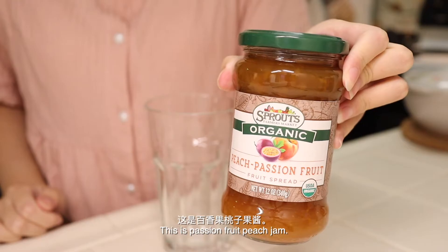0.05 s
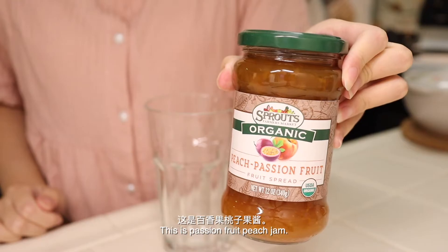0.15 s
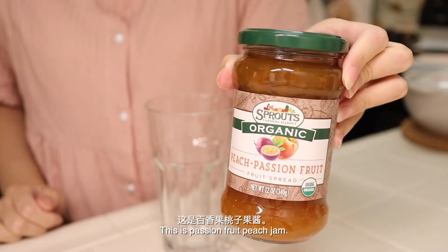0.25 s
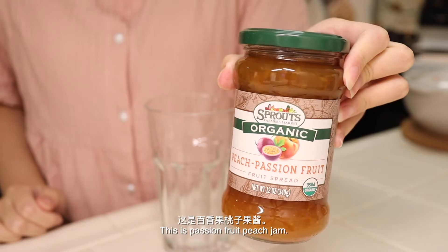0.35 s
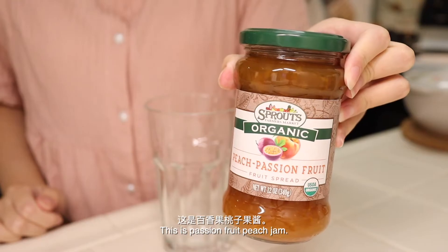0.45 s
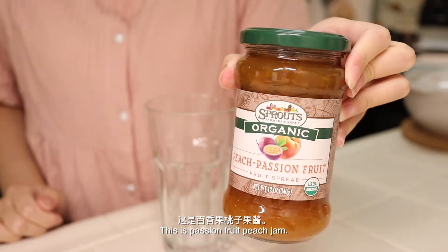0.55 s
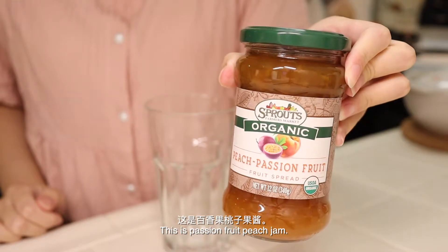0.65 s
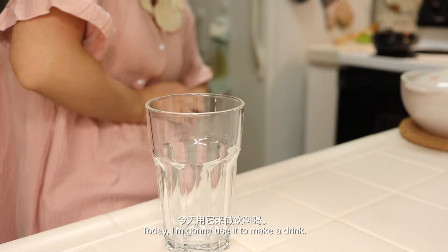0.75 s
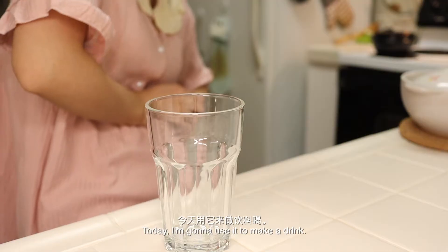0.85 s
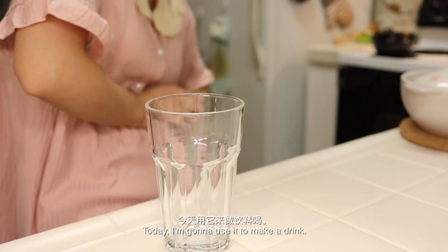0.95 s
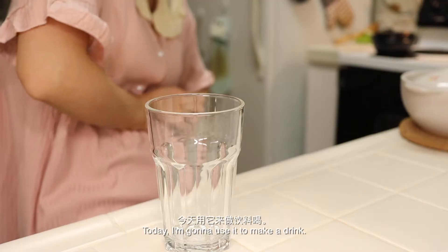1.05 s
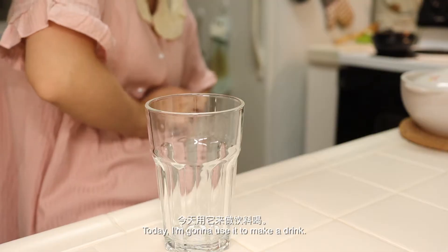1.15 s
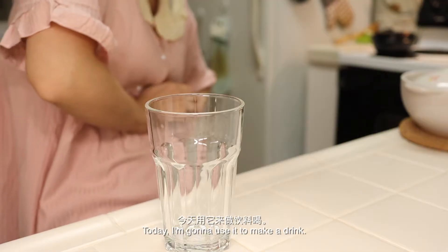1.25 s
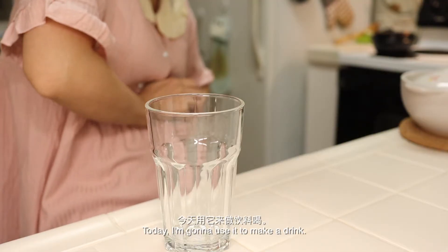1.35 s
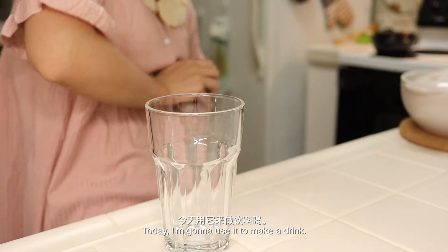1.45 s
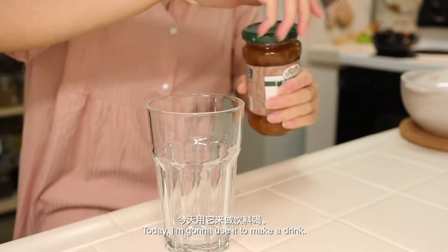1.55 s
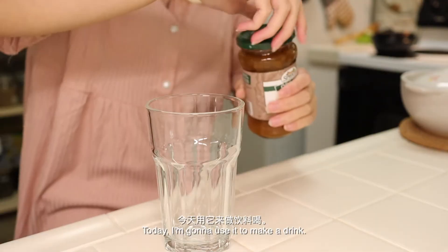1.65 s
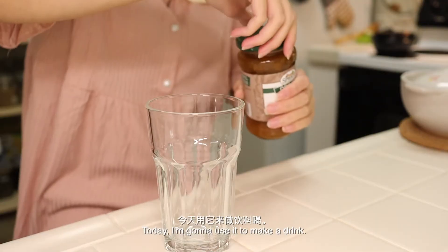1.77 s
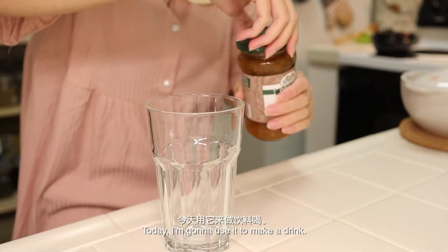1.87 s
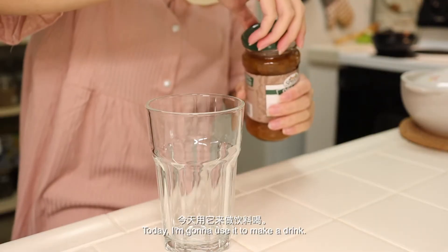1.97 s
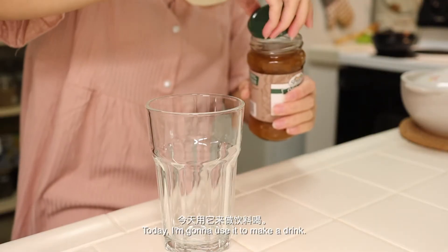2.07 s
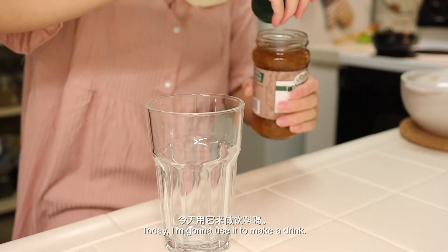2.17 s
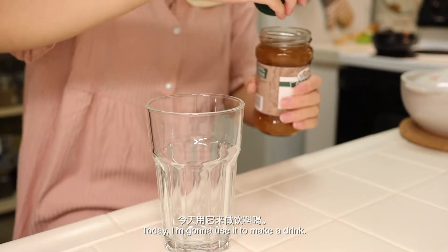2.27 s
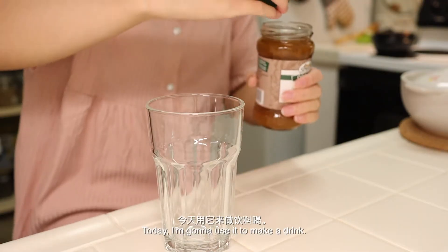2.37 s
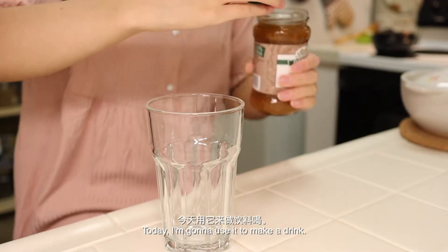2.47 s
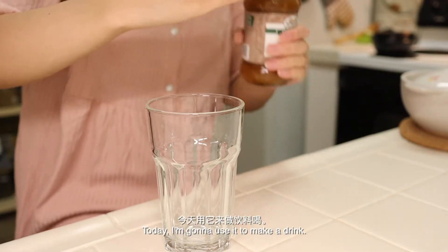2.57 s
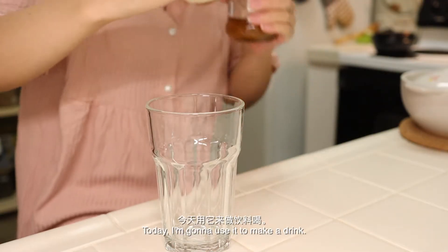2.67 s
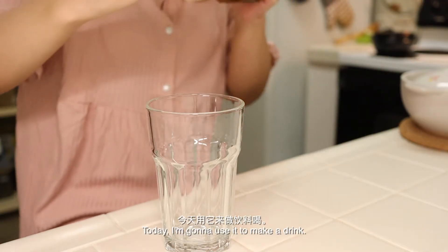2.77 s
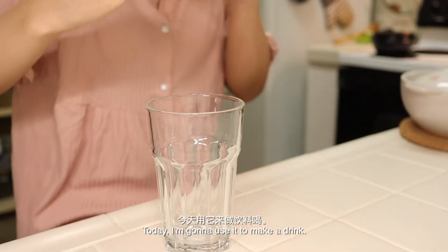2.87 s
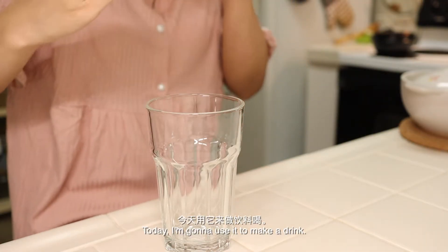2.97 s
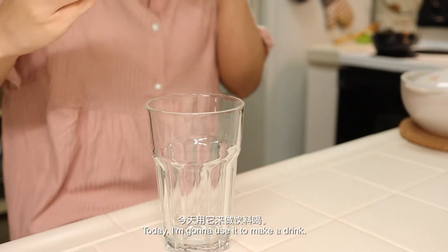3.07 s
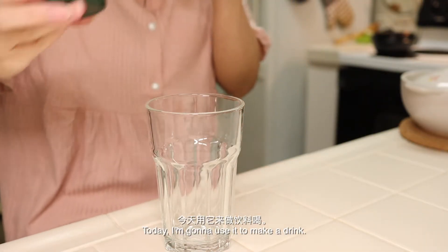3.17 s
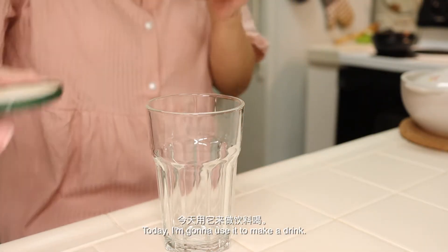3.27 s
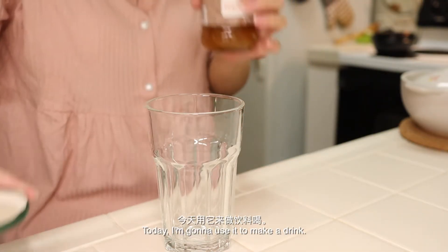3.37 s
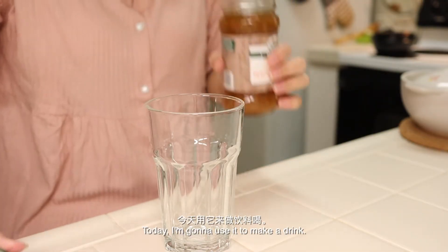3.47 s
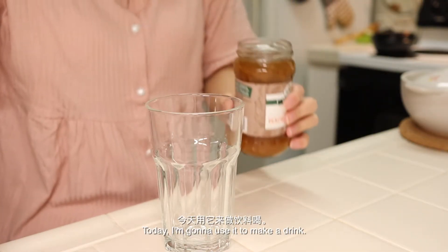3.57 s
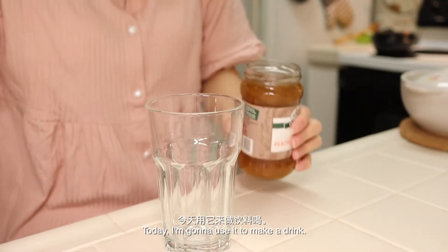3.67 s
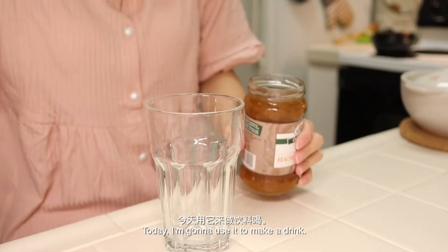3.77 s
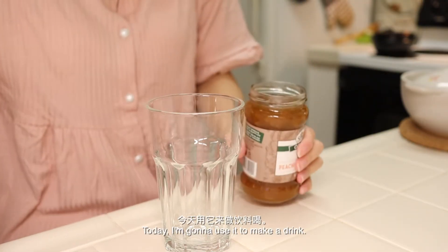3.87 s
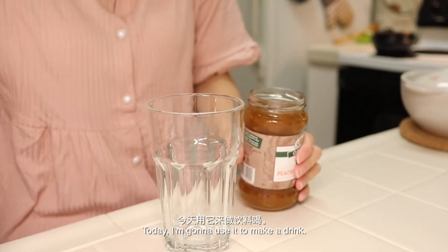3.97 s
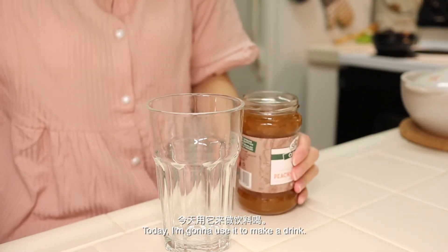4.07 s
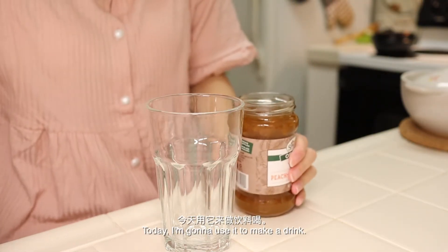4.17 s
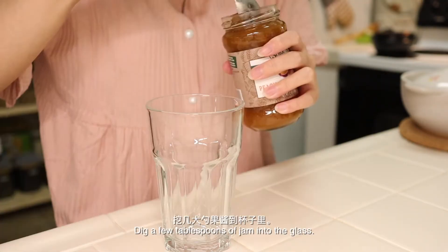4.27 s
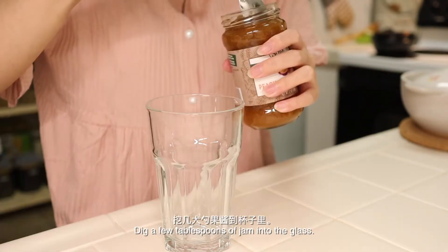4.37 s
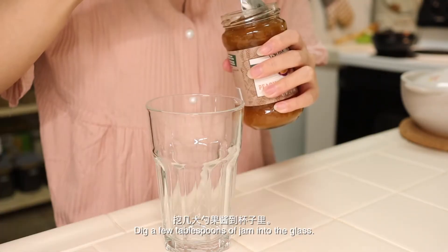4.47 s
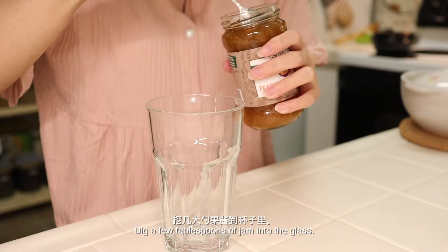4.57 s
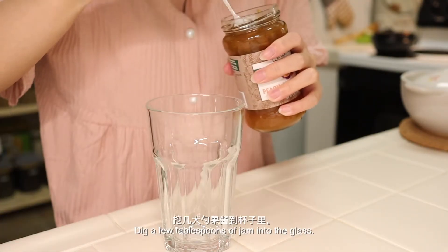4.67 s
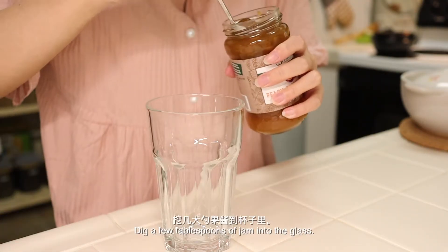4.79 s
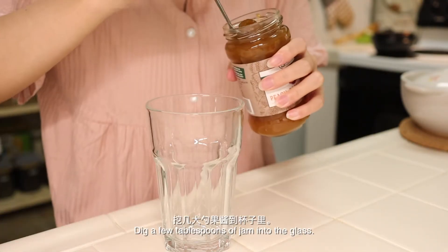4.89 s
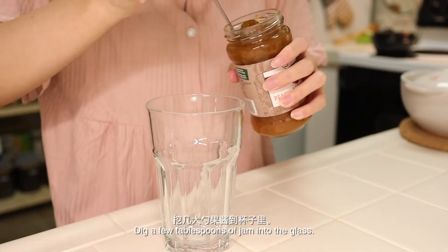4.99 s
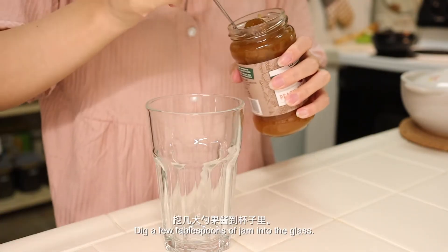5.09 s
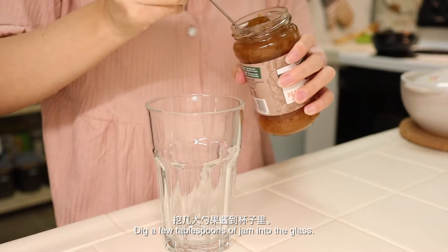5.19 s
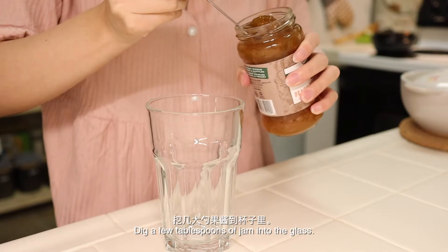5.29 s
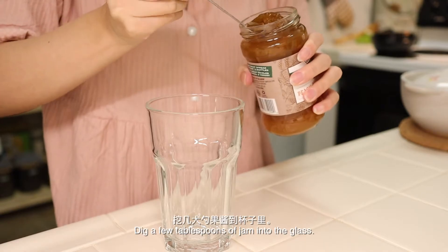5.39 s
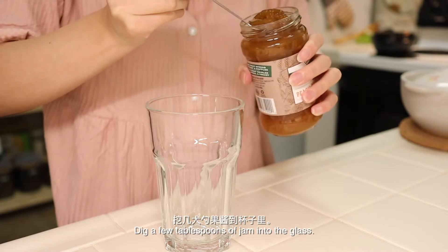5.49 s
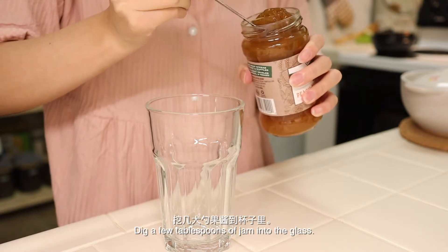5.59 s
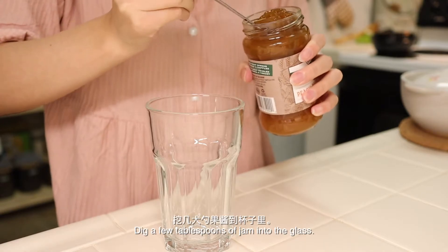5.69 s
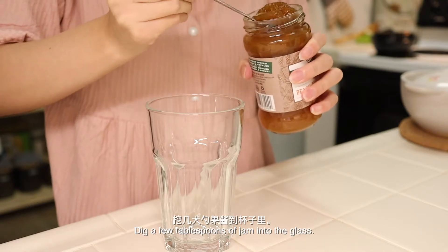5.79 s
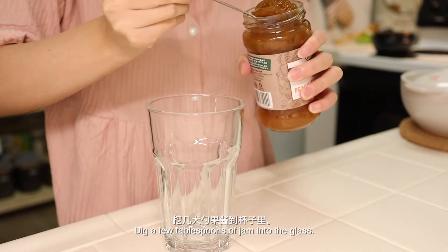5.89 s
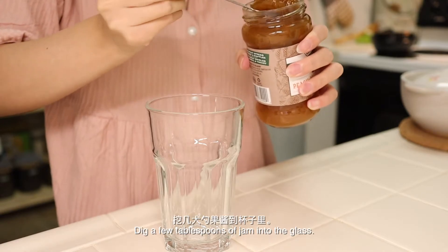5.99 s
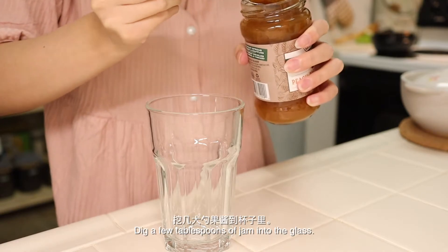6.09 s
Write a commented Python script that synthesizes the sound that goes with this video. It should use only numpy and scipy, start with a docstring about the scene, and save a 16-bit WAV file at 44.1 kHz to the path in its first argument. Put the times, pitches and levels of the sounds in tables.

```python
"""Over fan noise and motor hum in a quiet kitchen, a jam jar's lid creaks by stick-slip, then pops as air rushes in.
The loose lid scrapes and rattles off the thread; after a soft brush and wet smacks it lands on the tiles and slides.
The jar is put down with a knock and slides, and its ringing stops abruptly; a spoon clinks and digs into sticky jam.
Blows are noise bursts plus decaying modes with reverberation; slides are noise in narrow resonances."""
import sys
import numpy as np
from scipy import signal
from scipy.fft import rfft, irfft
from scipy.io import wavfile
from scipy.ndimage import uniform_filter1d

SR = 44100
rng = np.random.default_rng(int(sys.argv[2]) if len(sys.argv) > 2 else 0)


def wav_record(signal):
    """Record a signal, one row per channel, as 16-bit PCM in the file named by sys.argv[1]."""
    frames = np.transpose(np.atleast_2d(signal))
    bounded = np.clip(frames, -1, 1)
    # unit amplitude maps onto the largest positive 16-bit level
    quanta = np.round(bounded * 32767).astype(np.int16)
    wavfile.write(sys.argv[1], SR, quanta)


N = 270774


def amp(db):
    """Decibel law: 20 dB is a tenfold amplitude."""
    return 10 ** (np.asarray(db) / 20)


def unit(x):
    """Normalisation to an rms amplitude of 1."""
    return x / np.sqrt(np.mean(x ** 2) + 1e-20)


def read(points, hz):
    """Linear interpolation of a table along a logarithmic frequency axis."""
    f, value = np.transpose(points)
    return np.interp(np.log(hz + 1), np.log(f + 1), value)


def add(mix, s, sound):
    """Superposition: adds a sound to the mix from time s."""
    part = mix[round(s * SR):][:len(sound)]
    part += sound[:len(part)]


def swell(span):
    """Half-sine envelope: one soft arch of level between two times."""
    return np.sin(np.pi * np.interp(np.arange(N) / SR, span, [0, 1]))


def colour(x, db_at, size=4096):
    """Minimum-phase filtering: a causal filter whose gain in dB is db_at(Hz)."""
    frequencies = abs(np.fft.fftfreq(size, 1 / SR))
    log_gain = np.log(amp(db_at(frequencies)))
    # the Hilbert transform of the log gain gives the phase
    response = np.exp(np.conj(signal.hilbert(log_gain)))
    taps = np.fft.ifft(response).real
    return signal.fftconvolve(x, taps[:size // 2])[:len(x)]


def noise(db_at):
    """Random noise: steady, of rms 1, with the spectral shape db_at(Hz)."""
    spectrum = rfft(rng.standard_normal(N))
    gain = amp(db_at(np.fft.rfftfreq(N, 1 / SR)))
    return unit(irfft(spectrum * gain, N))


def band(centre_hz, width_hz):
    """Resonance: noise of rms 1 in a single peak."""
    return noise(lambda hz: -20 * np.log10(1 + ((hz - centre_hz) / width_hz * 2) ** 2))


def rub(span, modes, width_hz, db):
    """Sliding friction: a light contact keeps the modes of a thing sounding for a moment."""
    ring = sum(amp(mode_db) * band(hz, width_hz) for hz, _, mode_db, _ in modes)
    return amp(db) * swell(span) * unit(ring)


def crack_burst(crack, crack_t60, tick):
    """Impact transient: a tick and a quickly dying clatter, shaped to the spectrum crack."""
    t = np.arange(SR // 2) / SR
    burst = rng.standard_normal(len(t)) * amp(-60 * t / crack_t60)
    burst /= np.linalg.norm(burst)
    burst[0] = tick
    own_power = uniform_filter1d(abs(rfft(burst)) ** 2, size=70)
    own_db = 10 * np.log10(own_power + 1e-9)
    own_hz = np.fft.rfftfreq(len(t), 1 / SR)
    # the burst's own smoothed spectrum is divided out
    return colour(burst, lambda hz: read(crack, hz) - np.interp(hz, own_hz, own_db))


def rebounds(rows, gap_s, loss_db, dull_db, face_loss_db=0, count=1):
    """Inelastic rebound: count bounces, each weaker and duller; near spot 0 face_loss_db adds to the loss."""
    return [(s + k * gap_s, db - k * (loss_db + face_loss_db * (1 - spot)), tilt_db - k * dull_db, spot)
            for s, db, tilt_db, spot in rows for k in range(count + 1)]


def ticks(span, db, tilt_db, count, spread_db=3):
    """Random excitation: faint blows at random moments and spots, one in each equal part of a span."""
    start, end = span
    blows_in_span = []
    for k, (when, size, spot) in enumerate(rng.random((count, 3))):
        s = start + (k + when) / count * (end - start)
        blows_in_span.append((s, db + spread_db * (2 * size - 1), tilt_db, spot))
    return blows_in_span


# Reverberation of the kitchen: (frequency [Hz], time to decay by 60 dB [s])
ROOM_T60 = [(100, 0.0021), (400, 0.1335), (1000, 0.31), (3500, 0.3397), (8000, 0.35), (15000, 0.23)]


def room(x, wall):
    """Reverberation: dense reflections decay by band; a far wall returns a scattered cluster of them."""
    taps = rng.choice([-1., 1.], SR // 2) * (rng.random(SR // 2) < .15)
    hz, t, z = signal.stft(taps, SR, nperseg=256)
    decay = amp(-60 * t / read(ROOM_T60, hz)[:, None])
    tail = signal.istft(z * decay, SR, nperseg=256)[1]
    t = np.arange(len(tail)) / SR
    build_up = 1 - np.exp(-t / 0.002)
    wall_cluster = wall * np.exp(-((t - .055) / 0.01) ** 2)  # centred 55 ms after the blow
    tail *= build_up + wall_cluster
    return signal.fftconvolve(x, tail / np.linalg.norm(tail))[:N]


def blows(rows, modes, crack, crack_t60, tick, room_db, pivot_hz, wall=0):
    """Modal superposition: a crack plus ringing modes; the spot weights the modes, the tilt sets brightness."""
    out, t = np.zeros(N), np.arange(SR // 2) / SR
    mode_hz, t60, first_db, second_db = np.transpose(modes)
    rings = amp(-60 * t / t60[:, None]) * np.sin(2 * np.pi * mode_hz[:, None] * t)
    rings[1::2] *= -1  # every other mode in the table swings in the opposite direction
    for s, db, tilt_db, spot in rows:
        mode_db = first_db + np.clip(spot, 0, 1) * (second_db - first_db)
        sound = crack_burst(crack, crack_t60, tick) + amp(mode_db) @ rings
        # tilt about the pivot, held constant beyond 2 octaves below and 3 above
        add(out, s, colour(sound, lambda hz: db + tilt_db * np.log2(np.clip(hz / pivot_hz, 1 / 4, 8))))
    return out + amp(room_db) * room(out, wall)


# Spectral shape of the fan noise: (frequency [Hz], relative density [dB per Hz])
AIR = [(20, -18), (35, -12), (75, 1), (110, -5.5), (190, 0), (290, -4.5), (440, 1.5), (600, -10),
       (1300, -12), (1900, -16.5), (2500, -16.5), (3200, -21.5), (7500, -25), (15500, -30.5)]
AIR_DB = -47.5  # rms level [dB]
# Lines of the motor hum: (frequency [Hz], rms level [dB])
HUM = [(46.5, -58.5), (59.6, -59), (119, -55.5), (359, -62), (1225, -72.5), (1715, -71)]


def kitchen():
    """Broadband and tonal noise: a fan's steady noise, and motor hum lines whose phases waver slightly."""
    t = np.arange(N) / SR
    air = amp(AIR_DB) * noise(lambda hz: read(AIR, hz))
    hum = np.zeros(N)
    for hz, db in HUM:
        waver = 0.37 * band(0, 1.368)  # phase [rad]
        hum += amp(db) * np.sqrt(2) * np.sin(2 * np.pi * hz * t + waver)
    return air + hum


BRUSH = (3.28, 3.355)  # start, end [s]


def finger_brush():
    """Friction noise: the lid brushes the fingers, a soft arch of broad noise around 6500 Hz."""
    return amp(-51.5) * swell(BRUSH) * band(6500, width_hz=8600)


# Sticky jam lets go: (time [s], level [dB], brightness [dB per octave], contact spot [0-1])
SMACKS = [(3.306, -4, 1, 0), (3.329, -0.5, 4, 0.1), (3.3395, 3, -6, 0.32), (5.439, -10, -9, 1),
          (5.507, -7.5, 6.5, 1), (5.527, -14, 16, .91)]
# Modes of the jam: (frequency [Hz], 60 dB decay [s], level at spot 0 [dB], level at spot 1 [dB])
JAM_MODES = [(2240, 0.0573, -45.5, -67), (5700, .015, -42, -66), (8950, 0.0059, -54, -39.5)]
# Heavily damped modes of the jam, as one spectrum: (frequency [Hz], level [dB])
JAM_CRACK = [(300, -45), (1200, -34), (2500, -21), (6000, -20), (10000, -22), (14000, -20), (16000, -26)]
DIGGING = (5.39, 5.56)  # start, end [s]


def sticky_jam():
    """Adhesive release: sticky jam lets go in small wet ticks, with fainter random ones during the digging."""
    wet = SMACKS + ticks(DIGGING, db=-16.5, tilt_db=4, count=5)
    return blows(wet, JAM_MODES, JAM_CRACK, crack_t60=.022, tick=.2, room_db=-9, pivot_hz=6000)


# The spoon touches the jar: (time [s], level [dB], brightness [dB per octave], contact spot [0-1])
CLINKS = [(4.677, -19.5, 2, 1), (4.8879, 0, 0.51, 0.07)]
# Modes of spoon against jar: (frequency [Hz], 60 dB decay [s], level at spot 0 [dB], level at spot 1 [dB])
SPOON_MODES = [(1740, .06, -32, -55), (2150, .04, -33, -55), (2930, .04, -25, -52), (3300, .025, -21, -50),
               (3640, .05, -23, -50), (3973, .15, -40, -60), (5146, .12, -39, -60), (7300, .008, -32, -11),
               (7950, .008, -38, -16), (9340, .06, -37, -40), (10950, .1, -39, -55), (11370, .08, -35, -55)]
# Heavily damped modes of spoon and jar, as one spectrum: (frequency [Hz], level [dB])
SPOON_CRACK = [(700, -46), (1400, -17.5), (1900, 5), (2500, 0.5), (3500, -9), (4400, -0.5), (5500, 0.5),
               (11000, 0), (12500, -14), (15500, -13)]
SPOON_ENTRY = (4.84, 4.875)  # start, end [s]


def spoon_on_glass():
    """Impact excitation: the spoon grazes and taps the jar's mouth, each main touch rebounding once."""
    touches = rebounds(CLINKS, gap_s=0.0034, loss_db=17, dull_db=3.0)
    touches += ticks(SPOON_ENTRY, db=-29, tilt_db=0.0, count=2)
    return blows(touches, SPOON_MODES, SPOON_CRACK, crack_t60=0.04257, tick=0.1447, room_db=-12, pivot_hz=5000)


# The jar's base meets the counter: (time [s], level [dB], brightness [dB per octave], contact spot [0-1])
KNOCKS = [(4.0256, 3, 1.5, 0.02), (4.0675, -5.5, -1.5, .32), (4.2368, -11.5, -1, 0.9)]
# Modes of full jar and counter: (frequency [Hz], 60 dB decay [s], level at spot 0 [dB], level at spot 1 [dB])
JAR_MODES = [(98, .14, -19, -45), (262, .1, -15, -23), (287, .42, -22, -32), (314, .25, -22, -27),
             (363, .22, -26, -28), (490, .3, -25, -28), (631, .25, -29, -32), (706, .22, -28, -30),
             (753, .2, -32, -34), (856, .2, -27, -32), (2116, .49, -30.5, -70), (5297, .2, -55, -75),
             (1021, .12, -23, -24), (1100, .06, -16, -18), (1400, .04, -21, -28), (1530, .1, -35, -37)]
# Heavily damped modes of jar and counter, as one spectrum: (frequency [Hz], level [dB])
JAR_CRACK = [(45, -13), (95, 19), (160, 15.5), (280, 30.5), (430, 26.5), (650, 27), (1100, 27), (1700, 12),
             (2600, 7), (3700, -9), (9000, -15.5), (14000, -37)]
JAR_SLIDE = (4.14, 4.25)  # start, end [s]
CUT_S = 4.262  # the jar's ringing stops abruptly here [s]


def jar_on_counter():
    """Coupled vibration: the full jar thuds on the counter, rocks while the glass rings, and slides."""
    rocking = rebounds(KNOCKS, gap_s=.013, loss_db=9.0, dull_db=3, count=3)
    knock = blows(rocking, JAR_MODES, JAR_CRACK, crack_t60=0.03706, tick=0.78, room_db=-11, pivot_hz=620,
                  wall=0.28)
    low_modes = JAR_MODES[2:9]
    slide = rub(JAR_SLIDE, low_modes, width_hz=120, db=-32)
    # the counter gives off little deep bass
    high_pass = signal.butter(2, 65, "high", fs=SR, output="sos")
    radiated = signal.sosfilt(high_pass, knock + slide)
    return radiated * np.clip((CUT_S - np.arange(N) / SR) / 0.000664, 0, 1)


# The lid lands on the tiles:
# (time [s], level [dB], brightness [dB per octave], contact spot [0 face - 1 edge])
LID_DROPS = [(3.5531, 1.5, -0.5, 0.037), (3.8611, -4, 2.5, 0.9879), (3.8879, -6.5, 2, 0.88)]
# Modes of the lid on the tiles: (frequency [Hz], 60 dB decay [s], level on face [dB], level on edge [dB])
FREE_LID_MODES = [(1141, .11, -19.5, -33), (3814, .23, -39, -27), (4188, .2, -26, -39),
                  (3138, .21, -39, -22), (5095, .18, -22, -43), (5505, .18, -30, -21),
                  (2970, .09, -31, -19), (4016, .15, -36, -32), (4490, .13, -28, -26),
                  (4900, .06, -18, -24), (6374, .04, -20, -26), (7120, .09, -42, -19),
                  (7330, .04, -42, -18), (7620, .035, -36, -14.5), (9324, .12, -52, -34),
                  (10960, .08, -36, -45), (11700, .03, -42, -26), (13750, .05, -52, -31),
                  (15100, .02, -26, -35)]
# Heavily damped modes of the free lid, as one spectrum: (frequency [Hz], level [dB])
FREE_LID_CRACK = [(250, -38), (900, 9.5), (2000, 5.5), (3200, 13), (5000, 17.5), (6400, 15.5), (7600, 2),
                  (8800, 3), (12000, 2), (15500, -9)]
LID_SLIDE = (3.725, 3.805)  # start, end [s]


def lid_on_counter():
    """Plate vibration: the lid lands near its face, slides singing in one mode, then clatters on its edge."""
    landings = rebounds(LID_DROPS, gap_s=.0062, loss_db=1.5, dull_db=8.0, face_loss_db=27.5)
    drops = blows(landings, FREE_LID_MODES, FREE_LID_CRACK, crack_t60=0.055, tick=0.65, room_db=-13.0,
                  pivot_hz=4100)
    singing = FREE_LID_MODES[3:4]
    return drops + rub(LID_SLIDE, singing, width_hz=37, db=-58.0)


# The loose lid catches on the thread:
# (time [s], level [dB], brightness [dB per octave], contact spot [0-1])
RATTLES = [(1.749, -14, -1.5, 0.06), (1.817, -1, 4, 0.01), (1.836, -3.5, 3, 0.24), (1.9223, 1, 3.5, 0.98),
           (2.019, -15, 3.5, 0.4)]
# Modes of the loose lid: (frequency [Hz], 60 dB decay [s], level at spot 0 [dB], level at spot 1 [dB])
LOOSE_LID_MODES = [(930, 0.039, -20, -56.5), (1166, 0.16, -28.5, -44.5), (1285, 0.04067, -26, -32),
                   (1630, 0.094, -35.5, -25.5), (3990, 0.031, -35, -42.5), (4170, 0.049, -32.5, -38),
                   (6360, 0.0256, -57, -42), (7350, 0.024, -70, -33), (7960, 0.016, -44, -32.5),
                   (8540, 0.00879, -64, -25.5)]
# Heavily damped modes of the loose lid, as one spectrum: (frequency [Hz], level [dB])
LOOSE_LID_CRACK = [(300, -37), (1100, 5.5), (2500, -13.5), (4200, -9), (9000, -29), (15000, -34.5)]
UNSCREW, LID_LIFT = (1.74, 1.92), (1.88, 2.01)  # start, end [s]


def lid_off_thread():
    """Intermittent contact: the loose lid scrapes along the thread and rattles where it catches."""
    catches = rebounds(RATTLES, gap_s=.0033, loss_db=11, dull_db=1.0)
    catches += ticks(LID_LIFT, db=-17.5, tilt_db=-2.5, count=4)
    rattle = blows(catches, LOOSE_LID_MODES, LOOSE_LID_CRACK, crack_t60=0.038, tick=0.22, room_db=-12.5,
                   pivot_hz=2500)
    return rattle + rub(UNSCREW, LOOSE_LID_MODES, width_hz=380, db=-44.0)


# Slips of the lid's seal: (time [s], level [dB], brightness [dB per octave], contact spot [0-1])
CREAKS = [(1.113, -20.5, -2.5, 0.11), (1.1497, -17.5, 2.5, .1), (1.157, -12.5, 1, 0.17),
          (1.1772, -0.5, 3, .05)]
# Modes of the seal: (frequency [Hz], 60 dB decay [s], level at spot 0 [dB], level at spot 1 [dB])
SEAL_MODES = [(2152, 0.026, -15, -40.5), (2393.7, 0.025, -34, -39), (4570, .012, -32, -36),
              (5430, .012, -31, -35.5)]
# Heavily damped modes of the seal, as one spectrum: (frequency [Hz], level [dB])
SEAL_CRACK = [(300, -11), (2000, 0.5), (3100, -4), (5000, 2), (8000, -13), (15000, -26.5)]


def seal_creak():
    """Stick-slip friction: the seal creaks in a few separate slips."""
    return blows(CREAKS, SEAL_MODES, SEAL_CRACK, crack_t60=.015, tick=.4, room_db=-8, pivot_hz=3000)


# Spectral shape of the air rushing in: (frequency [Hz], relative density [dB per Hz])
INRUSH_AIR = [(25, 12), (300, 4), (700, -34), (1500, -29), (5000, -11), (15000, -21)]
INRUSH = (1.183, 1.195)  # start, end [s]


def air_inrush():
    """Turbulent flow: air rushes in as the vacuum breaks, a brief arch of mostly low noise."""
    return amp(-23.0) * swell(INRUSH) * noise(lambda hz: read(INRUSH_AIR, hz))


# The lid snaps up and hits the thread:
# (time [s], level [dB], brightness [dB per octave], contact spot [0-1])
POPS = [(1.1887, 0.4, -0.0507, 0.12), (1.2003, -22, 2, 1)]
# Modes of the tight lid: (frequency [Hz], 60 dB decay [s], level at spot 0 [dB], level at spot 1 [dB])
TIGHT_LID_MODES = [(1037, 0.019, 5, -43), (1363.7, 0.01, -8.5, -22), (2490, 0.012, -4, -11),
                   (2750, 0.007892, 4.5, -3.5), (3440, 0.023, -14, 1), (3510, 0.015, -2, -10),
                   (4340.3, 0.0091, -38, -12), (5160, .015, -35, -29), (6900, 0.020092, -16, -28.5),
                   (7190, .15, -41, -18), (7470, .03, -24, 5), (11400, 0.027, -26, -32),
                   (14900, .06, -37, -29)]
# Heavily damped modes of the tight lid, as one spectrum: (frequency [Hz], level [dB])
TIGHT_LID_CRACK = [(40, 21), (200, 27.5), (600, 9.5), (1000, 26.5), (1600, 20), (2600, 26.5), (4000, 21.5),
                   (5200, 15), (6200, 7), (10000, 7), (15000, 0)]


def lid_pop():
    """Snap-through: the tight lid springs up as the vacuum breaks and rings for a moment."""
    return blows(POPS, TIGHT_LID_MODES, TIGHT_LID_CRACK, crack_t60=0.008734, tick=1.0, room_db=-5.0,
                 pivot_hz=2000, wall=0.59)


def scene():
    """Linear superposition: all sources summed in mono."""
    jam_and_spoon = finger_brush() + sticky_jam() + spoon_on_glass()
    counter = jar_on_counter() + lid_on_counter()
    opening = lid_off_thread() + seal_creak() + air_inrush() + lid_pop()
    return (kitchen() + jam_and_spoon + counter + opening)[None]


EDGE_HZ = 16000  # upper band limit


def record(dry):
    """Overload and band limiting: peaks beyond full scale are clipped, then a low-pass filter follows."""
    low_pass = signal.firwin(255, EDGE_HZ, window=("kaiser", 8), fs=SR)
    return signal.oaconvolve(np.clip(dry, -1, 1), low_pass[None], "same")


dry = scene()
out = record(dry)
wav_record(out)
```